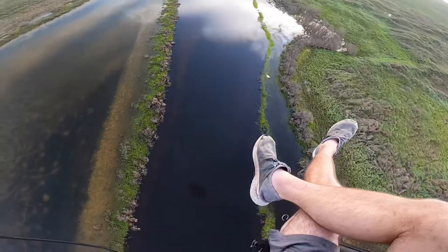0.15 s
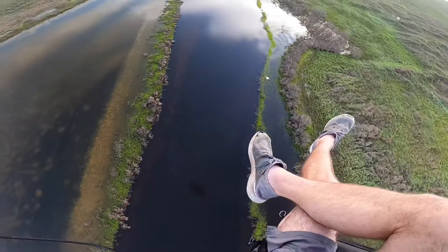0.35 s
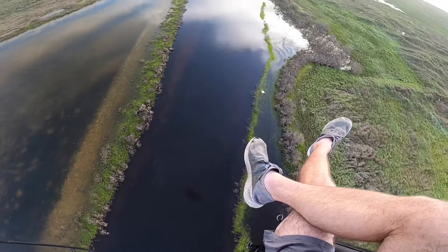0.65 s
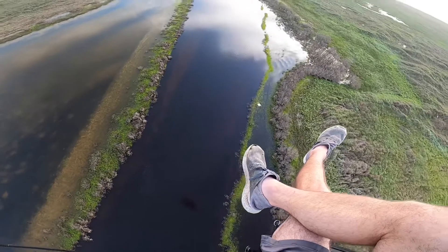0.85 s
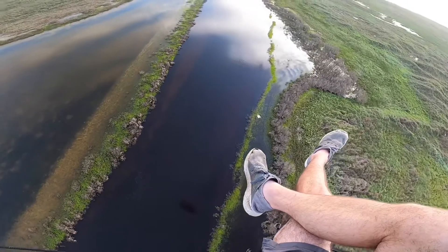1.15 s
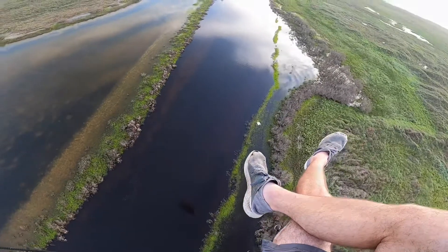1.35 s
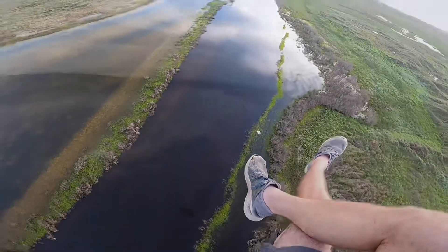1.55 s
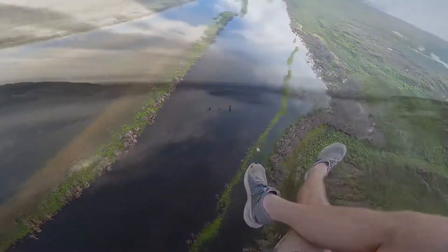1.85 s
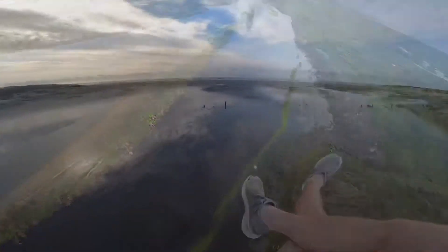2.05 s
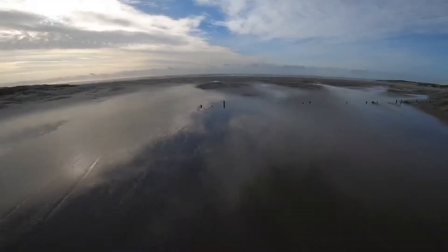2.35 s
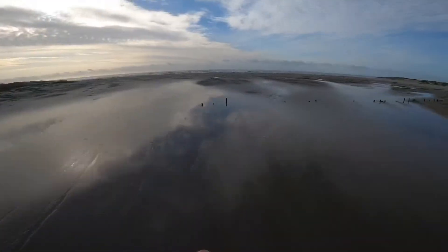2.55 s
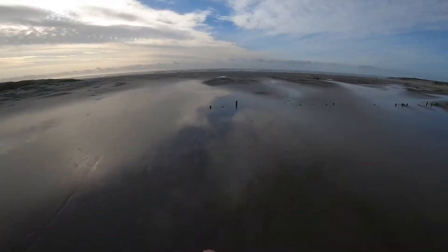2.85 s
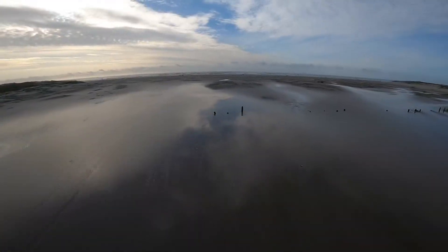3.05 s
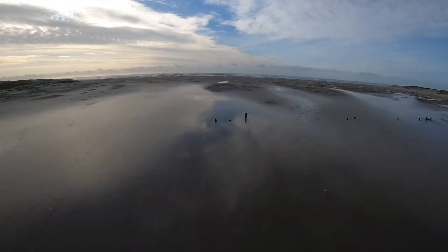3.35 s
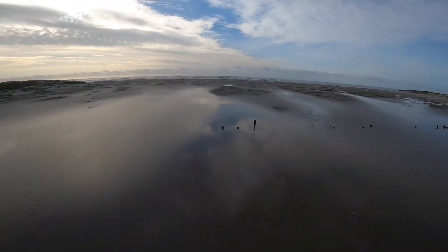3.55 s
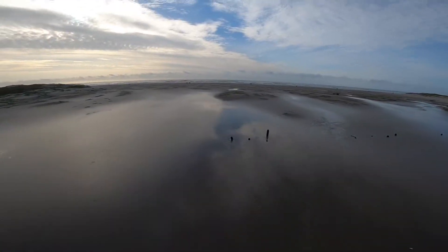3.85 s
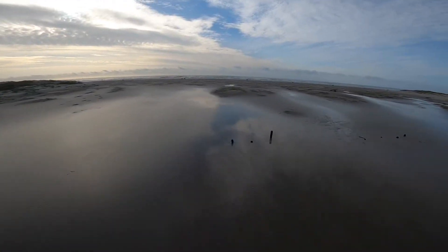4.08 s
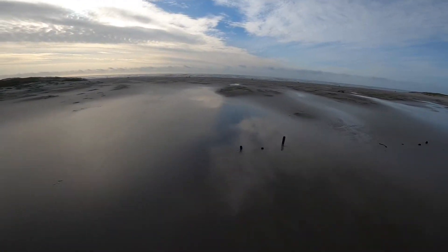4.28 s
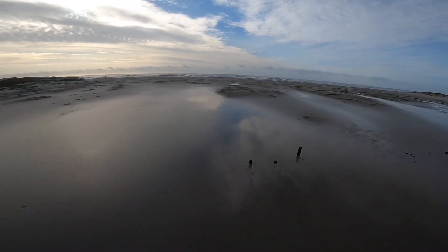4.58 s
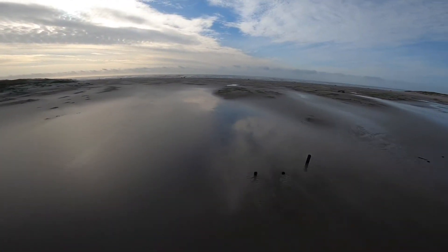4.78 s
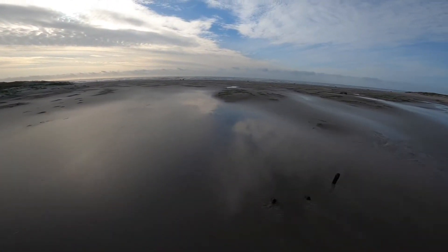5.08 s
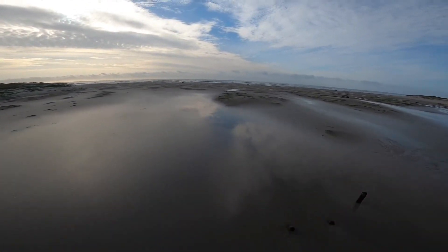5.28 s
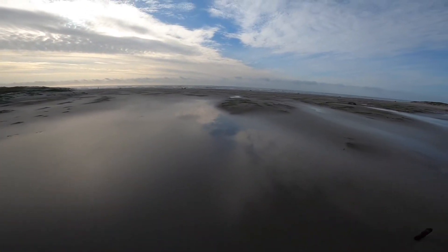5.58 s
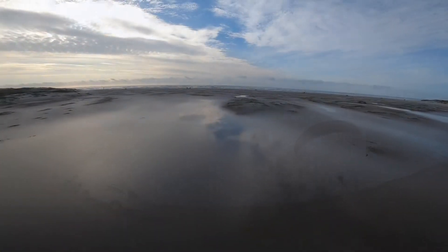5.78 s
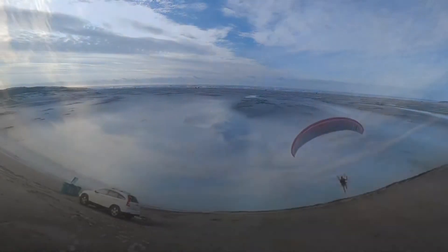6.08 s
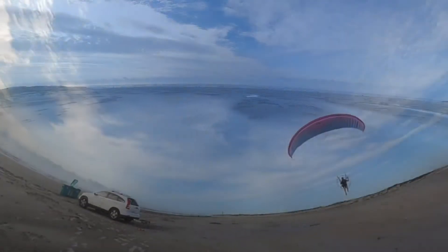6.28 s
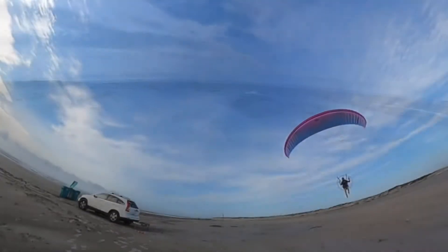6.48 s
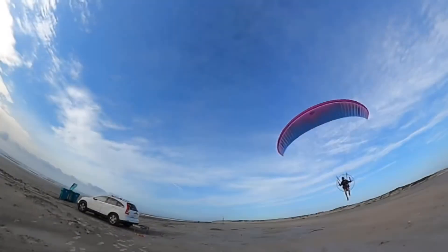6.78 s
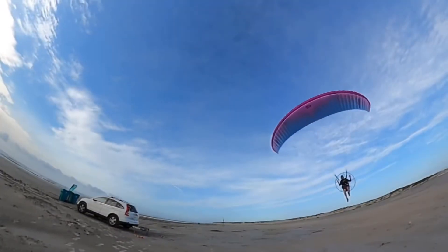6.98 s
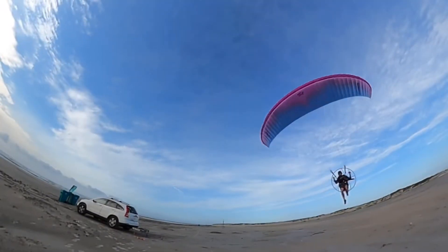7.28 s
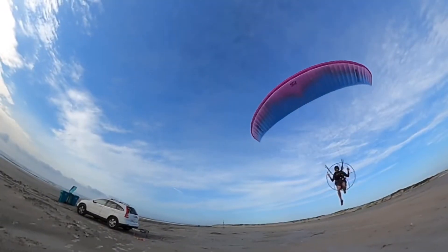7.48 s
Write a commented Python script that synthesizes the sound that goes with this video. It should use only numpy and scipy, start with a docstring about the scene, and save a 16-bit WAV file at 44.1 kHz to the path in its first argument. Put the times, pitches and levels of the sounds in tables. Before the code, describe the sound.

A paramotor is heard without pause from three outdoor positions. From 0 to about 1.4 s, a microphone on the pilot catches a steady, low two-stroke buzz, propeller throb and broad rushing air. Between 1.4 and 2.35 s this melts into a second view skimming wet flats: slightly lower in pitch, rougher, with richer blade tones and deeper chopping, plus a very faint top hiss. It holds until about 3.5 s, then throttle lifts the pitch slightly to a peak near 4.4 s, before it eases back by 5 s and stays level. From about 5.8 to 7.1 s it crossfades to a beach microphone. The approaching engine has a thinner buzz, airy propeller wash and a dull reflection from the sand, growing louder and brighter, with pitch edging upward until the end around 7.7 s, before any overhead pass.

```python
"""Paramotor from three places

Heard in the harness at height, then skimming wet flats, then from the beach as it flies in, with crossfades.
A one-cylinder two-stroke drives a two-blade propeller through a reduction: both are sums of sine multiples,
so firing and blade tones beat, and the blades chop the exhaust. Air rush is shaped noise in overlapping
bands that pulse with the blades; a faint top-end sizzle and a dull reflection off the sand complete it."""
import sys
import numpy as np
from scipy import signal
from scipy.fft import rfft, irfft, next_fast_len
from scipy.io import wavfile
from scipy.ndimage import uniform_filter1d

SR = 44100
rng = np.random.default_rng(int(sys.argv[2]) if len(sys.argv) > 2 else 0)


def store_wav(level_fs):
    """Save 16-bit WAV to argv[1]."""
    pcm = np.round(np.clip(np.atleast_2d(level_fs), -1, 1) * 32767)
    wavfile.write(sys.argv[1], SR, pcm.T.astype(np.int16))


N = 336483

BLADE_RATIO = .5267  # blade passes per firing
# flying in over the beach: the moment of passing overhead lies after the end
SPEED_M_S, OVERHEAD_S = 10, 8.9
NEAR_M = 17  # distance at which nearing adds no gain


def undb(db):
    """Turn decibels into an amplitude factor."""
    return 10 ** (np.asarray(db) / 20)


def walk(rate_hz, count):
    """Random levels held for 1 / rate_hz and smoothed twice; spread near 1."""
    hold = max(int(SR / rate_hz), 1)
    steps = np.repeat(rng.standard_normal(count // hold + 1), hold)
    return 1.49 * uniform_filter1d(uniform_filter1d(steps, hold), hold)[:count]


def fade(seconds, start, full, leaving, gone, bend_in=1, bend_out=1):
    """Gain that rises, holds and falls; a bend of 1 is straight, more sags."""
    rise = np.clip((seconds - start) / (full - start), 0, 1) ** bend_in
    fall = np.clip((gone - seconds) / (gone - leaving), 0, 1) ** bend_out
    return rise * fall


def distance_m(seconds):
    """Distance from the listener on the beach to the wing, closing at a steady speed."""
    return SPEED_M_S * (OVERHEAD_S - seconds)


def sizzle(place, seconds, blade_turns):
    """Thin band-passed hiss at the very top, louder once a blade pass and once a propeller turn."""
    # level_db (rms on reaching full, before pulsing), growth_db_per_s
    sizzle_rows = [None, (2.25, 2.6, 5.6, 6.5, -73.5, 3.0), (5.9, 6.4, 7.3, 9., -70, 4.5)]
    count = len(seconds)
    if sizzle_rows[place] is None:
        return np.zeros(count)
    *times, level_db, growth_db_per_s = sizzle_rows[place]
    _, full_s, leaving_s, _ = times
    band = signal.butter(1, (11800, 13800), "bandpass", fs=SR, output="sos")
    hiss = signal.sosfilt(band, rng.standard_normal(count))
    blade_db = 1.8 * np.cos(2 * np.pi * blade_turns)
    turn_db = 1.9 * np.cos(np.pi * blade_turns)
    pulse_db = blade_db + turn_db + .9 * walk(60, count)
    grown_db = level_db + growth_db_per_s * (np.minimum(seconds, leaving_s) - full_s)
    envelope = fade(seconds, *times, bend_in=1.5, bend_out=1.5)
    return hiss / hiss.std() * envelope * undb(grown_db + pulse_db)


def rush(place, blade_turns, tilt_db, pulse_db, flicker_db):
    """Turbulent air as bands half an octave apart; above the bass they swell per blade pass and flicker."""
    # base spectrum of the air: pitch_hz, then high_db, low_db, beach_db (all dB per Hz)
    air_spectrum = np.array([(28, -53, -50.5, -57), (45, -49, -48, -62), (90, -43.5, -48.5, -53),
                             (150, -48, -48, -51), (230, -50.5, -44.5, -49.5), (356, -52.5, -48.5, -53.5),
                             (515, -53.5, -49, -53), (735, -54, -53, -55), (1000, -54.5, -56, -57.5),
                             (1864, -59, -61.5, -62.5), (2720, -66.5, -72, -67.5), (3380, -68.5, -74, -70),
                             (3940, -65, -75, -72), (4480, -72, -79, -76.5), (5390, -77, -82.5, -78.5),
                             (8540, -94, -96, -100), (11050, -107, -105, -110), (12600, -118, -114, -122),
                             (15500, -135, -118, -130)])
    count = len(blade_turns)
    size = next_fast_len(count)
    hz = np.maximum(np.arange(size // 2 + 1) * SR / size, 1)
    density_db = np.interp(np.log(hz), np.log(air_spectrum[:, 0]), air_spectrum[:, place + 1])
    colour = undb(density_db) * np.sqrt(SR / 2)
    low_cut = np.minimum(hz / 20, 1) ** 2
    air = rfft(rng.standard_normal(size)) * colour * low_cut

    gust, flutter = walk(24.89, count), walk(120, count)
    gust -= uniform_filter1d(gust, SR // 6)  # gusts stay short, without slow swells
    # one blade passes a little louder than the other
    beat = np.cos(2 * np.pi * blade_turns) + 0.16 * np.cos(np.pi * blade_turns)
    out = 0
    for centre_hz in 16 * 2 ** np.arange(0, 10.1, .5):
        octaves = np.log2(hz / centre_hz)
        window = np.cos(np.pi * np.clip(octaves, -.5, .5)) ** 2
        band = irfft(air * window, size)[:count]
        # no shared movement up to 250 Hz, all of it from 1 kHz
        upper = np.clip(np.log2(centre_hz / 250) / 2, 0, 1)
        # the band near 4 kHz pulses most
        ring = 1 + 0.73 * np.exp(-(np.log2(centre_hz / 4000) / .4) ** 2)
        flicker = flicker_db * gust + .45 * flutter + 1.05 * walk(140, count)
        movement_db = upper * (pulse_db * ring * beat + flicker) + .4 * walk(20, count)
        treble_db = tilt_db * max(np.log2(centre_hz / 1000), 0)
        out = out + band * undb(movement_db + treble_db)
    return out


def off_the_sand(direct):
    """Direct sound plus a duller copy off the sand, later the nearer the wing comes."""
    engine_m, ear_m = 3.1, 1.5  # heights above the sand
    sand_share, sand_hz = 0.41, 1300  # reflected amplitude, corner of its low-pass
    samples = np.arange(N)
    # extra path of the bounce, at 343 m/s
    lag = 2 * engine_m * ear_m / distance_m(samples / SR) / 343 * SR
    late = np.interp(samples - lag, samples, direct)
    dulling = signal.butter(1, sand_hz, fs=SR, output="sos")
    return direct + sand_share * signal.sosfiltfilt(dulling, late)


def tones(multiples, table, column, hz, smear):
    """Wavering multiples of a rate; the low ones drag apart in time, the high ones stay one sharp pulse."""
    waver_db, waver_rad = .9, .08
    # a narrow ring of the drive housing lifts tones that glide through it
    housing_hz, half_width_hz, lift_db = 1832, 8, 6
    turns = np.cumsum(hz) / SR
    count = len(turns)
    out = 0
    for multiple, levels in zip(multiples, table):
        ring_db = lift_db * np.exp(-((multiple * hz - housing_hz) / half_width_hz) ** 2)
        lag_rad = smear * np.log(multiple) + waver_rad * walk(6, count)
        level_db = np.interp(column, range(len(levels)), levels)
        gain = undb(level_db + ring_db + waver_db * walk(3.97, count))
        out = out + np.sqrt(2) * gain * np.cos(2 * np.pi * multiple * turns - lag_rad)
    return out


def propeller(column, firing_hz):
    """Blade tones: whole multiples of the rate at which blades pass."""
    # row k is multiple k of the blade rate, rms levels before waver, ring and place gain: # high_db,
    # low_cruising_db, low_surging_db, low_turned_db, beach_db
    blade_levels = [(-20.5, -24.5, -24.3, -34, -37), (-37, -27.5, -30, -34, -53),
                    (-26, -23, -23.8, -19.5, -52), (-33.5, -22, -20, -29, -43),
                    (-36.2, -26.5, -28.5, -23.5, -31.5), (-32.5, -34, -45, -37, -49),
                    (-41, -30.5, -26.5, -36, -35.5), (-47, -31.5, -38.3, -32, -38),
                    (-38, -26.5, -37, -43, -35), (-44, -32.8, -36.0, -34.5, -36), (-41, -41, -44, -33, -43),
                    (-44, -46.2, -37, -33.9, -34), (-48, -43, -43, -38.5, -39), (-40, -36.5, -44, -44, -40),
                    (-37.5, -49.9, -41.8, -39.9, -39.6), (-54.0, -50, -45, -43, -42.5),
                    (-44, -55.5, -47, -59, -39), (-54.9, -39.5, -42.5, -50.5, -48),
                    (-54.8, -43.5, -41.5, -49, -55), (-59, -39, -38.5, -39, -47),
                    (-54, -42, -59, -44.8, -50.3), (-57, -46, -45.6, -42, -48),
                    (-52.2, -41.5, -46.7, -42.5, -56), (-56, -54, -54.5, -52, -57.5),
                    (-53.3, -44, -45.7, -43, -47.2), (-58, -51, -62, -61.8, -51.8),
                    (-58, -49.9, -53.5, -55.5, -54.5)]
    multiples = range(1, len(blade_levels) + 1)
    return tones(multiples, blade_levels, column, BLADE_RATIO * firing_hz, smear=14.)


def exhaust(column, firing_hz, blade_turns, chop):
    """Firing tones, chopped as the blades sweep their path, which puts side tones beside each."""
    # multiples of the firing rate that sound; the last three are the whine of the drive
    firing_multiples = [*range(1, 14), 15, 17, 30]
    # one row per multiple, rms levels before chopping, waver, ring and place gain: # high_db, low_cruising_db,
    # low_surging_db, low_turned_db, beach_db
    firing_levels = [(-24, -24, -25.5, -24.5, -23.5), (-27, -20.5, -19, -21, -42),
                     (-40, -34.5, -42.5, -33, -51), (-34, -48, -38, -33, -37), (-48, -30, -28, -29, -52),
                     (-38, -30.5, -29.5, -29.5, -39), (-55, -47, -46.5, -48, -40.5),
                     (-44, -39.5, -36.5, -49, -49), (-43, -45, -44.2, -41.5, -41),
                     (-55.2, -45, -41, -46, -39.5), (-50, -47, -40, -42.2, -52),
                     (-59, -54.5, -43.9, -47, -54), (-52, -45, -40, -45, -50),
                     (-39, -42.5, -38.5, -47, -54), (-41.5, -62, -47, -41, -57),
                     (-50, -59, -57, -60, -48.5)]
    firing = tones(firing_multiples, firing_levels, column, firing_hz, smear=25.)
    return firing * (1 + chop * np.cos(2 * np.pi * blade_turns))


def paramotor(place, column, nearing_db):
    """Engine, propeller and air locked to one firing rate, as one place hears them; column picks the colour."""
    # firing rate, one list per place (high, low, beach): time_s, rate_hz
    firing_rates = [
        [(0, 128.9), (1.3, 128.8), (2.35, 128.2)],
        [(1.374, 121.3), (1.7, 120.3), (2.2, 119.2), (2.45, 118.3), (3.55, 118.2), (4.0, 121.3), (4.2, 122.1),
         (4.4, 122.3), (4.6, 121.1), (5.0, 119.4), (5.7, 119.3), (6.0, 119.8), (7.15, 119.7)],
        [(5.8042, 119.0), (6.6, 119.3), (7.2, 120.3), (7.7, 122.8)],
    ]
    # swell and dying away, one row per place: start_s, full_s, leaving_s, gone_s
    place_fades = [(-.2, -.1, 1.4, 2.35), (1.38, 2.35, 5.65, 7.15), (5.81, 7.1, 7.8, 7.9)]
    # bend of those fades, one row per place [exponents]: tones_in, tones_out, air_in, air_out
    fade_bends = [(1, 1.5, 1, 1.5), (.9, 1.2, 1.1, 2.2), (1.9, 1, .9, 1)]
    # blade action, one row per place: chop_depth [share], rush_pulse_db, flicker_db (both base depths)
    blade_action = [(0.21, 0.84, .55), (0.38, 1, .55), (.2, 0.7, 0.5)]
    # air level [dB]: high, low cruising, low surging, low turned, beach
    air_levels_db = .7, -.7, .2, .6, -.6
    # base treble tilt [dB per octave above 1 kHz], same columns
    air_tilts_db = .1, -.7, .4, .3, .4
    tones_nearing = .3  # share of the nearing gain in dB that tones get; air gets it all
    brighten = .11  # treble tilt, dB per octave for each dB of nearing

    time_s, rate_hz = np.transpose(firing_rates[place])
    start, end = max(int(time_s[0] * SR), 0), min(int(time_s[-1] * SR), N)
    seconds = np.arange(start, end) / SR
    column, nearing_db = column[start:end], nearing_db[start:end]
    firing_hz = np.interp(seconds, time_s, rate_hz)
    blade_turns = BLADE_RATIO * np.cumsum(firing_hz) / SR
    chop, pulse_db, flicker_db = blade_action[place]

    motor = exhaust(column, firing_hz, blade_turns, chop) + propeller(column, firing_hz)
    tone_fade = fade(seconds, *place_fades[place], *fade_bends[place][:2])
    tone_gain = tone_fade * undb(tones_nearing * nearing_db)

    rush_db = np.interp(column, range(len(air_levels_db)), air_levels_db)
    tilt_db = np.interp(column, range(len(air_tilts_db)), air_tilts_db) + brighten * nearing_db
    air = rush(place, blade_turns, tilt_db, pulse_db, flicker_db)
    air_fade = fade(seconds, *place_fades[place], *fade_bends[place][2:])
    air_gain = air_fade * undb(rush_db + nearing_db)

    out = np.zeros(N)
    out[start:end] = tone_gain * motor + air_gain * air + sizzle(place, seconds, blade_turns)
    return out


def scene():
    """The three places in turn, crossfaded; only the beach hears distance and the sand."""
    # colour over the flats: time_s, pose (0 cruising, 1 surging, 2 turned)
    flight_poses = [(3.5, 0), (3.85, .7), (4.2, 1), (4.6, 1.1), (5.05, 1.9), (5.5, 2), (5.8, 1), (6.2, 1)]
    seconds = np.arange(N) / SR
    pose = np.clip(np.interp(seconds, *np.transpose(flight_poses)), 0, 2)
    steady = np.zeros(N)
    nearing_db = 20 * np.log10(NEAR_M / distance_m(seconds))
    high = paramotor(place=0, column=np.zeros(N), nearing_db=steady)
    low = paramotor(place=1, column=1 + pose, nearing_db=steady)
    beach = paramotor(place=2, column=np.full(N, 4.), nearing_db=nearing_db)
    fade_in = np.minimum(np.arange(N) / (SR / 250), 1)  # 4 ms
    return (fade_in * (high + low + off_the_sand(beach)))[None]


def record(dry):
    """Soft saturation rounds the peaks a little, then a steep low-pass cuts the top."""
    top_hz = 15650
    rounded = np.tanh(.6 * dry) / 0.61
    top_cut = signal.ellip(14, .2, 70, top_hz, fs=SR, output="sos")
    return signal.sosfilt(top_cut, rounded)


dry = scene()
out = record(dry)
store_wav(out)
```